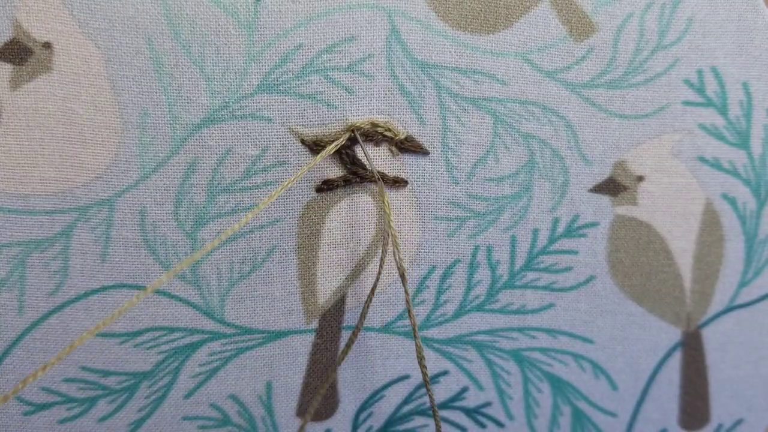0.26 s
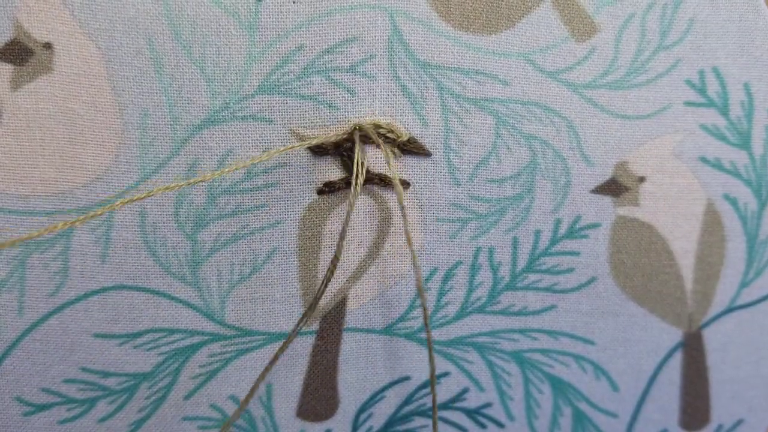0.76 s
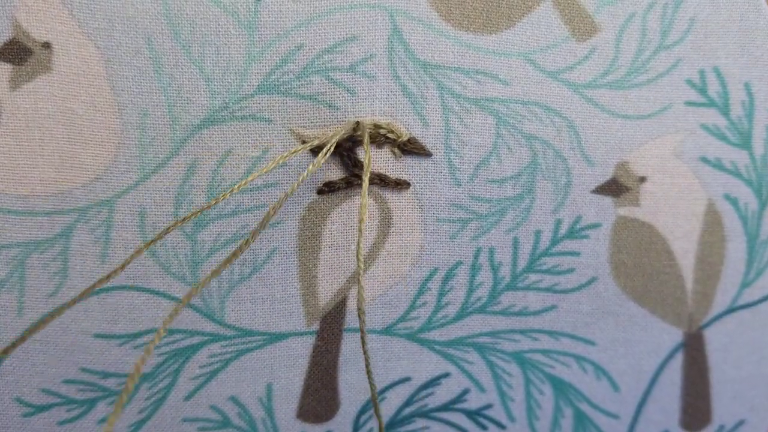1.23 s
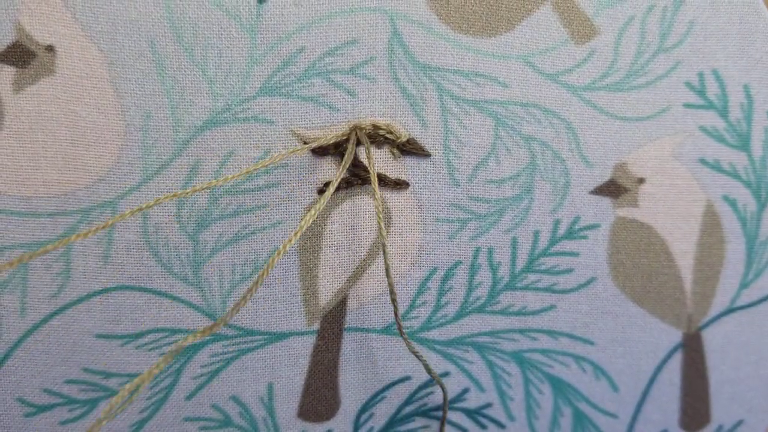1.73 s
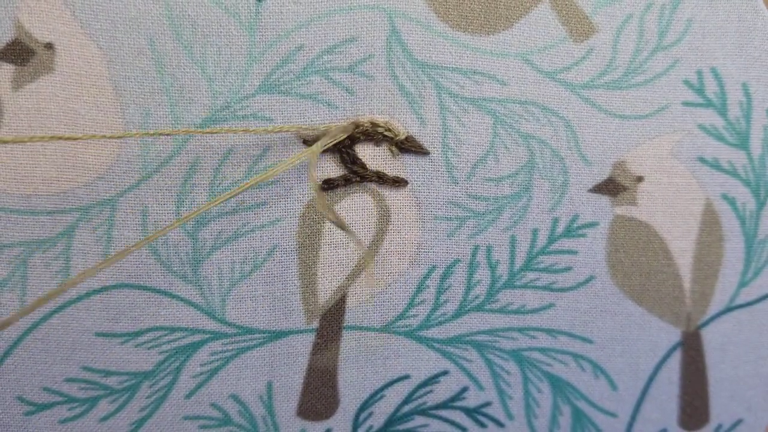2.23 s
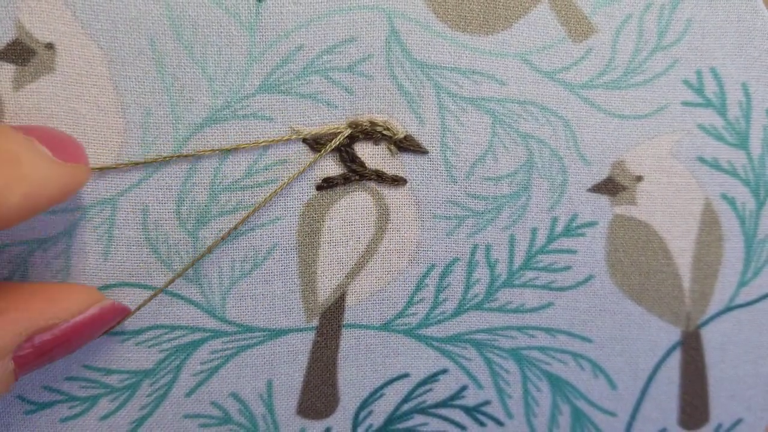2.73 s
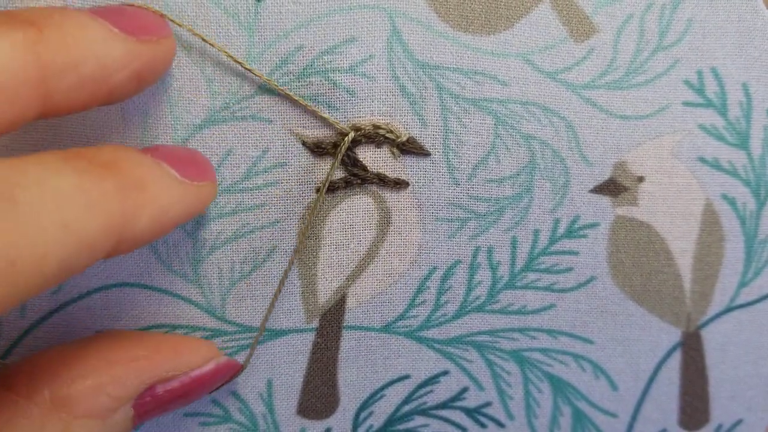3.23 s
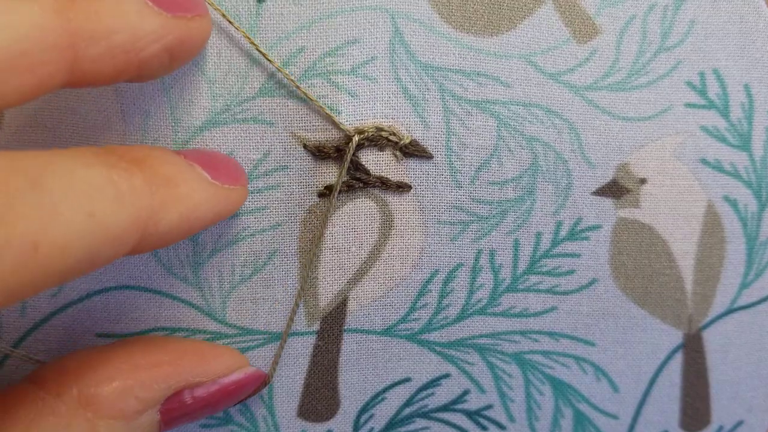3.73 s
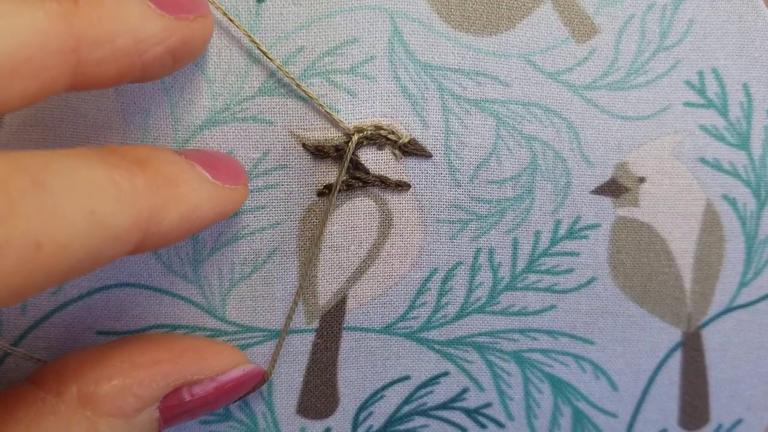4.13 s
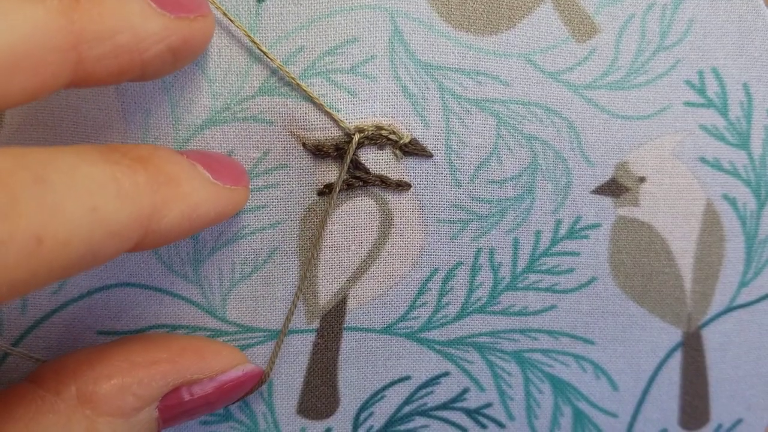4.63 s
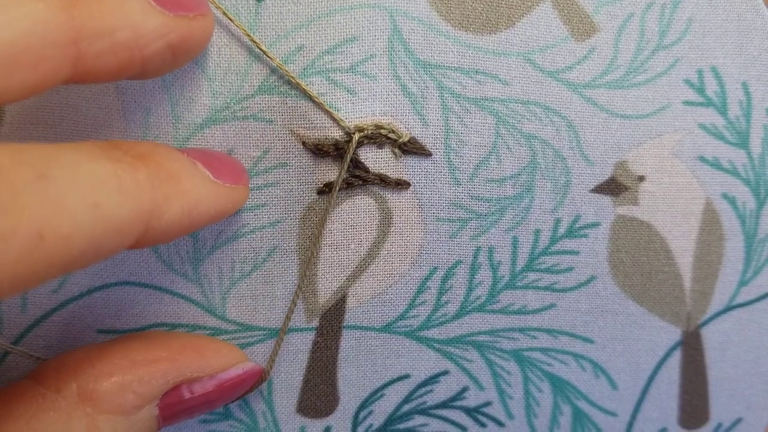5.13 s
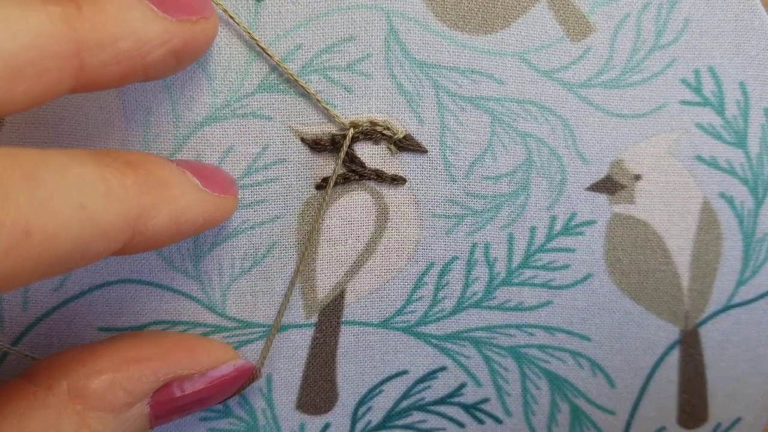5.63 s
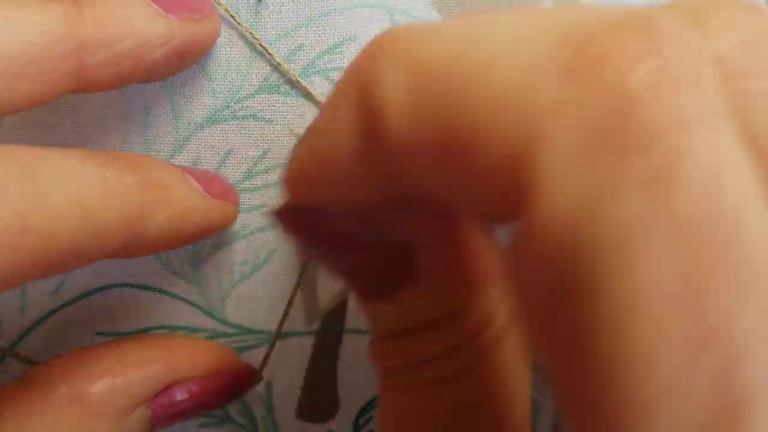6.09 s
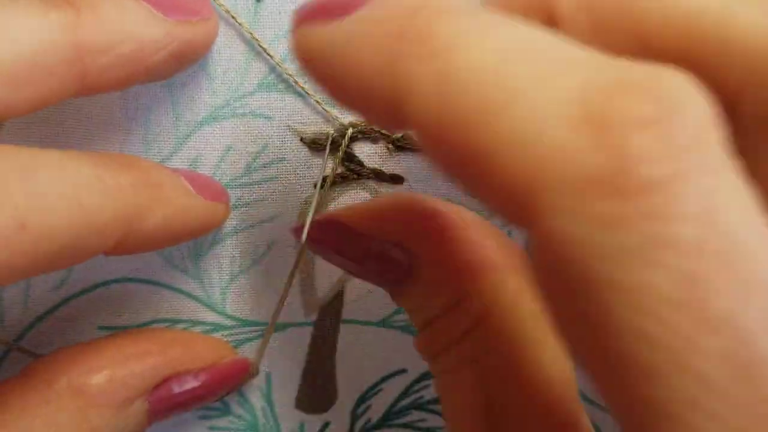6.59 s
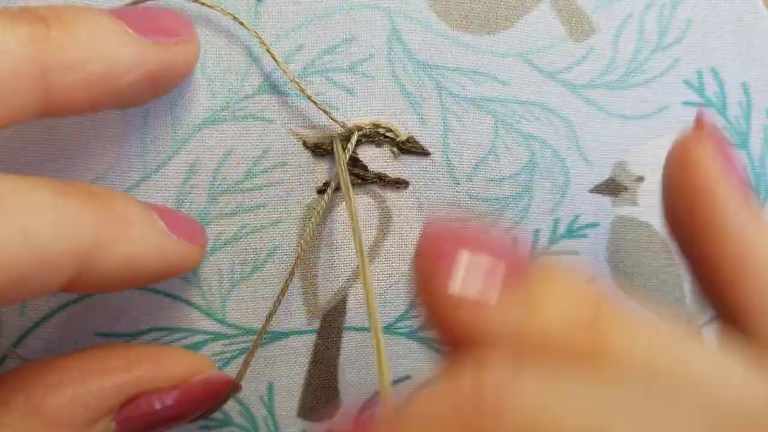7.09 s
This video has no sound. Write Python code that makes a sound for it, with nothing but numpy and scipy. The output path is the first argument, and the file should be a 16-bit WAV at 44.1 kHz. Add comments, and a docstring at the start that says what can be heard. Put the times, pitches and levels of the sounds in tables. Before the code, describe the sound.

Close stereo microphone in a quiet furnished room. Thread scuffs stretched cloth, a needle pops up with a drummy snap, and a long uneven thread pull rasps and rumbles through. Small dry ticks and light finger brushes follow, then near-silence, a few nudges and clicks, and a louder puncture with a quick, scratchy pull from below.

```python
"""Hand embroidery in a hoop

Close up in a quiet room, a needle pops up, and later down, through stretched cloth.
Damped modes make the cloth ring like a small slack drum at each pop and nudge.
Trains of random slips, filtered by resonances, make the thread rasp through the weave and shake the cloth.
Single impulses make the ticks of fibres as the stitch is laid and a few small clicks off to the right.
Thin steel pings, the whir of twisted thread and soft rubs join in over shaped noise for the room air."""
import sys
import numpy as np
from scipy import signal
from scipy.fft import rfft, irfft, next_fast_len
from scipy.io import wavfile
from scipy.ndimage import uniform_filter1d

SR = 44100
rng = np.random.default_rng(int(sys.argv[2]) if len(sys.argv) > 2 else 0)


def generate_wav(signal):
    """Clip the signal to [-1, 1] and save it as 16-bit WAV at the path in sys.argv[1]."""
    frames = np.transpose(np.atleast_2d(signal))
    scaled = np.clip(frames, -1, 1) * 32767
    pcm = np.round(scaled).astype(np.int16)
    wavfile.write(sys.argv[1], SR, pcm)


N = 324135  # samples, 7.35 s
BINS_HZ = np.fft.rfftfreq(4096, 1 / SR)
EDGE_HZ = 14620  # upper band limit

# All levels in the tables are relative; each layer is trimmed where it is mixed.
# room air: spectral density [f/Hz, level/dB per Hz]
AIR_SPECTRUM = [(15, -45), (25, -24), (50, -6), (81, -23), (95, -6), (120, -4.5), (157, -10), (210, -19.5),
                (267, -30), (313, -26.5), (442, -37), (2010, -41), (5100, -43), (6480, -45), (14400, -42.5)]
# room air: likeness of left and right [f/Hz, correlation/1]
AIR_LIKENESS = [(50, 0.99), (200, 0.86), (500, 0.25), (1200, 0), (3000, 0.025), (14000, 0)]
AIR_DB = -61.5  # rms
# reverberation of the room [f/Hz, t60/s]
ROOM_DECAY = [(100, 0.21), (500, 0.27), (2000, 0.25), (6000, 0.31), (14000, 0.16)]

# spectrum of the cloth jerked by the thread [f/Hz, level/dB]
TUG_SPECTRUM = [(25, -53.5), (45, -10.5), (65, -0.5), (120, 2), (175, 0), (240, -11), (330, -25.5),
                (600, -50), (1500, -73)]
# spectrum of strands rubbing the hole [f/Hz, level/dB]
SCRAPE_SPECTRUM = [(100, -19), (220, -3), (300, 5), (390, -2), (480, 0), (600, -4), (700, -14), (850, -14),
                   (1030, -20.5), (1650, -25), (2300, -32), (5000, -42)]
# spectrum of single fibres over the weave [f/Hz, level/dB]
HISS_SPECTRUM = [(300, -26), (1000, -8.5), (2000, 1.5), (3200, 1), (4500, -1), (5700, -2), (7800, -3),
                 (9500, 3), (11000, 8.5), (12800, 1), (14500, -3)]
# resonances of the rasp, one table for each way of sliding [f/Hz, width/Hz, level/dB]
LOOSE_RESONANCES = [(237, 120, 13), (720, 300, -3), (1230, 300, 11.5), (6660, 640, 11.5),
                    (10800, 2200, 0.5)]
NEEDLE_RESONANCES = [(1330, 160, 13.5), (2450, 450, 8), (3930, 1300, 6.5), (6700, 750, 5),
                     (10900, 1500, 1.5)]
UP_RESONANCES = [(677, 280, 5.5), (1362, 72, 10), (2375, 310, 10), (3420, 930, 0), (4150, 760, 4),
                 (6800, 400, 13)]
DOWN_RESONANCES = [(1250, 140, 11.7), (3000, 270, 3.3), (3960, 120, 14.4), (6780, 290, 7.4),
                   (8600, 310, 2.8), (11400, 350, 3.9), (12100, 420, 4.6)]
# balance of the fibre hiss [f/Hz, left minus right level/dB]
LOOSE_BALANCE = [(1000, 1), (3000, -0.5), (7000, -11), (10000, -7.5), (13000, -3.5)]
NEEDLE_BALANCE = [(1000, -12), (3000, -5.5), (7000, -7), (10000, -3), (13000, -7.5)]
UP_BALANCE = [(1000, 16.5), (3000, -9), (7000, -12), (10000, -13), (13000, -1.5)]
DOWN_BALANCE = [(1000, -4), (4000, -12), (7000, -9), (10000, -3), (13000, 3)]

# slack thread and fingers brush the cloth
# [start t/s, length/s, crest as share of length/1, tug level/dB, scrape level/dB, hiss level/dB]
BRUSH_STROKES = [(.13, 0.43, 0.48, -66.5, -81, -78), (.76, 0.23, 0.17, -56.5, -75.5, -78),
                 (.85, 0.66, 0.57, -61, -94, -86.5), (3.08, 0.13, 0.7, -67.5, -85, -75.5),
                 (3.45, 0.1, 0.82, -69, -74, -74), (3.62, 0.2, 0.095, -68, -71, -77.5),
                 (5.02, 0.13, 0.85, -72, -70.5, -73), (5.13, 0.24, 0.36, -62.5, -74.5, -73.5),
                 (5.32, 0.088, 0.73, -57, -85, -66), (5.68, .18, 0.65, -59, -78.5, -77.5),
                 (5.84, 0.23, 0.68, -70, -72.5, -81)]
BRUSH_SHAPE = 1.18  # exponent of the arch that a brush follows
# the thread grips and is dragged a short way
# [start t/s, hold/s, tug level/dB, scrape level/dB, hiss level/dB]
THREAD_DRAGS = [(.505, 0.082, -38.5, -53, -74), (2.213, 0.014, -63, -57.5, -59.5)]
# the needle shaft slides through after each pop
# [start t/s, hold/s, tug level/dB, scrape level/dB, hiss level/dB]
SHAFT_SLIDES = [(1.498, 0.096, -34, -47.5, -63), (6.753, 0.083, -35.5, -45.5, -59)]
GRIP_S, LET_GO_DB_PER_S = 0.011, 364  # a slide takes hold quickly and dies once it is through
# easing off throughout a slide [tug, scrape, hiss rate/(dB/s)]
EASE_RATES = (53.5, 89, 36)
# the long pull after the needle comes up [t/s, tug level/dB, scrape level/dB, hiss level/dB]
LONG_UP_PULL = [(1.68, -51, -83, -80), (1.714, -48, -70, -81.5), (1.77, -50, -72, -81.5),
                (1.84, -50, -70, -71.5), (1.98, -37, -58, -70), (2.07, -45, -61.5, -74.5),
                (2.2, -43.5, -61.5, -69), (2.28, -46.5, -66, -77.5), (2.36, -38.5, -56.5, -74),
                (2.42, -45.5, -62, -84), (2.5, -40.5, -53.5, -72), (2.63, -45.5, -59, -84.5),
                (2.74, -61, -76, -85)]
# the last of that thread drawn snug [t/s, tug level/dB, scrape level/dB, hiss level/dB]
SNUG_UP_PULL = [(2.82, -57, -78, -81.5), (2.87, -53.5, -64.5, -68.5), (2.93, -72, -67.5, -74.5),
                (2.975, -62, -77, -77), (3.01, -62, -86, -75.5), (3.1, -65, -91, -88)]
# the pull from below after the needle goes down [t/s, tug level/dB, scrape level/dB, hiss level/dB]
PULL_FROM_BELOW = [(6.98, -73, -103, -94), (7.016, -37, -52, -68.5), (7.06, -46, -48.5, -62.5),
                   (7.218, -39, -53, -64), (7.244, -45, -54, -68), (7.278, -45, -60.5, -69.5),
                   (7.35, -39, -47.5, -62)]
SURGE_DB, SURGE_S = 2.5, 0.025  # the thread sticks and gives: rms depth and smoothing length

# pops and nudges of the cloth, free and with two fingers pressing on it
# [t/s, level/dB, signed strength/1, contact standard deviation/ms, snap level re blow/dB]
FREE_CLOTH_BLOWS = [(0.7232, -26, 0.29, 1.2, -50), (1.4977, -17, 0.45, 0.13, 9),
                    (2.4557, -34.5, 0.54, 0.56, -50)]
HELD_CLOTH_BLOWS = [(5.271, -38.5, -1.13, 0.7, -54), (6.0068, -35, -1.43, 0.72, -53),
                    (6.0146, -25, 0.4, 0.91, -48), (6.156, -22.5, 0.47, 1.18, -50),
                    (6.1615, -31.5, -1.3, 0.79, -45), (6.749, -12, -0.82, 0.17, -1)]
# modes of the cloth, free and pressed tighter [f/Hz, level/dB, t60/s]
FREE_CLOTH_MODES = [(69.4, 1, 0.19), (89.6, 5, 0.059), (124.4, 2, 0.14), (166, -23.5, 0.106),
                    (278, -76, .1), (415, -41, .09), (453, -18.5, 0.19), (620, -19, .05), (780, -29, .05),
                    (1320, -13, .04), (1600, -37, 0.033), (2570, -18, .035)]
HELD_CLOTH_MODES = [(101.4, 1, 0.12), (144.6, -9.5, 0.11), (172, -14.5, 0.21), (261, -17.5, 0.12),
                    (356, -13, 0.025), (490, -9, 0.025), (600, -39, .04), (761, -20, 0.085),
                    (860, -38, 0.092), (1226, -21, .05), (1295, -29, 0.051), (1860, -47, .05)]
# spectrum of the needle breaking through [f/Hz, level/dB]
SNAP_SPECTRUM = [(100, -17.5), (400, 4), (800, -7.5), (1400, 3), (2000, -15), (3000, -19.5), (4000, -14),
                 (5500, -56), (14500, -60)]
# spectrum of fibres parting round the needle [f/Hz, level/dB]
CRACK_SPECTRUM = [(400, -14), (1400, 15), (2400, -0.5), (3900, -1.5), (4800, -10.5), (5800, -26.5),
                  (6800, -7), (8000, -28), (11000, -13), (14500, -32)]
RIGHT_LAG_MS = 0.085  # sounds of the cloth reach the right ear this much later

# small clicks off to the right [t/s, peak level/dB, room level re click/dB]
CLICK_EVENTS = [(0.821, -60.5, 2), (0.8712, -58, -9), (1.4256, -64, -1), (1.453, -65, 7), (5.6257, -42, 3),
                (5.914, -54, 2), (5.9725, -55, 0), (6.09, -59, 2), (6.123, -60, -1), (6.1614, -54, 3.5),
                (6.3606, -71, -11.5), (6.6977, -68.5, -11), (6.9574, -63.5, -15.5)]
# spectrum of the clicks [f/Hz, level/dB]
CLICK_SPECTRUM = [(250, 2), (900, 2.5), (1300, -2.5), (2400, -4), (3500, -3), (5400, -10.5), (6700, -7.5),
                  (7800, -29), (9500, -15), (14000, -29.5)]
# resonances of the clicks [f/Hz, width/Hz, level/dB]
CLICK_RESONANCES = [(895, 63, 5), (1712, 310, 8.5), (3280, 520, 10.5), (4480, 850, 7)]

# the needle tip pings faintly as it feels for its place [t/s, f/Hz, level/dB, t60/s]
NEEDLE_PINGS = [(1.423, 2920, -71, 0.11), (1.451, 1760, -64.5, 0.095), (1.453, 2900, -74.5, .1),
                (6.362, 1900, -67, 0.013), (6.3613, 2900, -77, 0.021), (6.698, 2310, -70, .025)]

# the whir of the twist during the long pull: one arch rising in pitch and loudness and falling back
WHIR_START_S, WHIR_LENGTH_S, WHIR_CREST = 1.9, 0.65, 0.47  # crest as share of length
WHIR_LOW_HZ, WHIR_HIGH_HZ, WHIR_DB = 3100, 4370, -74.5

# fibres catching and letting go [t/s, treble snap level/dB, midrange knock level/dB]
TICK_EVENTS = [(2.2167, -67, -42.5), (2.2335, -64, -44), (3.1758, -59, -75), (3.2696, -58.5, -61),
               (3.5235, -53, -51), (3.6056, -52.5, -65), (3.646, -43, -47), (3.68, -57, -56),
               (3.7456, -58.5, -54.5), (3.7802, -62, -58), (4.4195, -51.5, -48), (4.4223, -72, -45.5)]
# resonances of the ticks [f/Hz, width/Hz, level/dB]
TICK_RESONANCES = [(450, 300, 4), (1300, 260, 10), (2200, 700, 7), (3500, 600, 4), (6700, 500, 3),
                   (10500, 1300, 9)]
# spectrum of a fibre plucking the cloth [f/Hz, level/dB]
KNOCK_SPECTRUM = [(100, -22), (300, 3), (520, 3), (900, 5), (1300, -1), (1700, -2), (2200, 0), (3200, -7),
                  (6000, -30), (14000, -45)]


def amp(db):
    """Decibel law: turns a level into an amplitude gain."""
    return 10 ** (np.asarray(db) / 20)


def unit(x):
    """Root-mean-square normalisation: scales x to rms 1."""
    return x / np.sqrt(np.mean(x ** 2) + 1e-20)


def read(points, hz=BINS_HZ):
    """Linear interpolation on a logarithmic frequency axis, for a curve given by points."""
    f, value = np.transpose(points)
    return np.interp(np.log(hz + 1), np.log(f + 1), value)


def bumps(resonances):
    """Resonance peaks: the sum in dB of bell-shaped Lorentzian curves."""
    return sum(db / (1 + (2 * (BINS_HZ - hz) / width) ** 2) for hz, width, db in resonances)


def add(mix, s, sound):
    """Superposition: lays a sound into the mix at time s."""
    part = mix[..., round(s * SR):][..., :sound.shape[-1]]
    part += sound[..., :part.shape[-1]]


def through(x, response):
    """Convolution: passes x through one impulse response, or one for each ear."""
    x, response = np.atleast_2d(x), np.atleast_2d(response)
    size = next_fast_len(x.shape[1] + response.shape[1], True)
    return irfft(rfft(x, size) * rfft(response, size), size)[:, :N]


def ring_of(db):
    """Minimum phase: a dB spectrum fixes a causal impulse response, here with energy 1."""
    log_gain = np.log(amp(np.concatenate([db, db[-2:0:-1]])))
    response = np.fft.ifft(np.exp(signal.hilbert(log_gain).conj())).real
    return response / np.linalg.norm(response)


def panned(left_db):
    """Interaural level difference: gains of two channels that differ by left_db."""
    return amp(np.array([[left_db], [-left_db]]) / 2)


def placed(x, left_db):
    """Interaural level and time differences: left_db sets the balance, and the left is a little earlier."""
    late = np.interp(np.arange(N) - RIGHT_LAG_MS * SR / 1000, np.arange(N), x[0])
    return panned(left_db) * np.array([x[0], late])


def scatter(fade_s):
    """Diffuse scattering: dense reflections, different in each ear, energy 1, nearly even spectrum."""
    t = np.arange(len(BINS_HZ)) / SR
    fade = amp(-60 * t / fade_s)
    z = rfft(rng.standard_normal((2, len(t))) * fade)
    # flatten the spectrum, then fade again by half as many decibels
    burst = irfft(z / abs(z), len(t)) * np.sqrt(fade)
    return burst / np.linalg.norm(burst, axis=1, keepdims=True)


def room(x):
    """Reverberation of a small furnished room: each band of a noise tail decays at its own rate."""
    hz, t, z = signal.stft(rng.standard_normal((2, SR // 2)), SR, nperseg=256)
    decay = amp(-60 * t / read(ROOM_DECAY, hz)[:, None])
    tail = signal.istft(z * decay, SR, nperseg=256)[1]
    # silent for 3 ms, then rising over 3.7 ms
    tail *= np.clip((np.arange(tail.shape[1]) / SR - 0.003) / 0.0037, 0, 1)
    return through(x, tail / np.linalg.norm(tail[0]))


def slips(per_s, spread_db):
    """Stick-slip friction as a random impulse train of uneven size and sign, rms 1."""
    at = np.flatnonzero(rng.random(N) < per_s / SR)
    size = rng.exponential(1, N)[at]
    sign = np.sign(rng.random(N)[at] - 0.5)
    train = np.zeros(N)
    train[at] = sign * amp(spread_db * np.minimum(size, 4))
    return unit(train)


def arch(start, length, crest):
    """Sinusoidal easing: a curve from 0 up to 1 at its crest and back to 0."""
    turning_s = start + length * np.array([0, crest, 1])
    return np.sin(np.pi / 2 * np.interp(np.arange(N) / SR, turning_s, [0, 1, 0]))


def air():
    """Ambient noise: low rumble, alike in both ears, under a thin even hiss."""
    hz = np.fft.rfftfreq(N, 1 / SR)
    left, other = rfft(rng.standard_normal((2, N)))
    same = np.clip(read(AIR_LIKENESS, hz), -1, 1)
    right = same * left + np.sqrt(1 - same ** 2) * other
    z = np.array([left, right])
    return amp(AIR_DB) * unit(irfft(z * amp(read(AIR_SPECTRUM, hz)), N))


def brushed(rows):
    """Speed-governed friction: tug, scrape and hiss gains swell and fade with the hand's speed, an arch."""
    return sum(np.outer(amp(levels_db), arch(start, length, crest) ** BRUSH_SHAPE)
               for start, length, crest, *levels_db in rows)


def slid(rows):
    """Friction of firm slides: gains of tug, scrape and hiss that grip, ease off and let go."""
    t, gains = np.arange(SR // 2) / SR, np.zeros((3, N))
    for start, hold, *levels_db in rows:
        fall_db = np.outer(EASE_RATES, t) + LET_GO_DB_PER_S * np.maximum(t - hold, 0)
        grip = np.minimum(t / GRIP_S, 1)
        add(gains, start, grip * amp(np.array(levels_db)[:, None] - fall_db))
    return gains


def pulled(rows):
    """Friction along one pull: gains of tug, scrape and hiss joined in dB, silent outside it."""
    s, *levels_db = np.transpose(rows)
    t = np.arange(N) / SR
    during = (t >= s[0]) & (t <= s[-1])
    gains = np.array([amp(np.interp(t, s, db)) for db in levels_db]) * during
    return uniform_filter1d(gains, size=300, axis=1)


def surges():
    """Slow stick-slip: a gain of rms 1 that wanders as the thread sticks and gives."""
    wander = uniform_filter1d(rng.standard_normal(N), size=round(SURGE_S * SR))
    return unit(amp(SURGE_DB * unit(wander)))


def weave(resonances, balance):
    """Resonant filtering by the weave: what one slipping fibre sounds like in each ear."""
    db = read(HISS_SPECTRUM) + bumps(resonances)
    lean_db = read(balance) / 2
    ears_db = np.array([db + lean_db, db - lean_db])
    # ring_of gives each ear energy 1, so their relative strength is restored
    strength = unit(np.linalg.norm(amp(ears_db), axis=1))
    return np.array([g * ring_of(ear) for g, ear in zip(strength, ears_db)])


def thread(gains, resonances, balance, tug_db, scrape_db, hiss_db, fibres_per_s, spread_db, room_db,
           body_share=0.33, spots=3):
    """Frictional excitation: twists jerk the cloth, strands scrape the hole, fibres hiss over the weave."""
    tugging, scraping = gains[:2] * surges()
    hissing = gains[2]
    peaks_db = bumps(resonances)
    tug_slips = slips(per_s=370, spread_db=2.5) * tugging
    tug = through(tug_slips, ring_of(read(TUG_SPECTRUM) + body_share * peaks_db))
    scrape_slips = slips(per_s=1800, spread_db=1.5) * scraping
    scrape = through(scrape_slips, ring_of(read(SCRAPE_SPECTRUM) + peaks_db))
    scrape = placed(scrape, left_db=4.5) + amp(-8.0) * through(scrape, scatter(fade_s=0.031))
    # fibres slip at several spots, each with its own paths to the ears
    spot_gain = hissing / np.sqrt(spots)
    fibres = sum(through(slips(fibres_per_s / spots, spread_db) * spot_gain, scatter(fade_s=0.025))
                 for spot in range(spots))
    hiss = through(fibres, weave(resonances, balance))
    direct = amp(tug_db) * placed(tug, left_db=6.5) + amp(scrape_db) * scrape + amp(hiss_db) * hiss
    return direct + amp(room_db) * room(direct)


def scuffs(scuff_db=-29, ms_per_contact_ms=11, muffle_hz=520):
    """Contact friction: each blow also rubs the weave for a moment; the softer the contact, the longer."""
    t, pressure = np.arange(SR // 5) / SR - 0.1, np.zeros(N)
    for s, db, _, contact_ms, _ in FREE_CLOTH_BLOWS + HELD_CLOTH_BLOWS:
        width = contact_ms * ms_per_contact_ms / 1000
        add(pressure, s + t[0] + width / 2, amp(db + scuff_db) * np.exp(-abs(t) / width))
    rubbing = slips(per_s=3600, spread_db=8) * pressure
    rub = placed(through(rubbing, ring_of(read(SCRAPE_SPECTRUM))), left_db=2)
    rub = signal.sosfilt(signal.butter(2, muffle_hz, fs=SR, output="sos"), rub)
    return rub + amp(-4.5) * room(rub)


def cloth(blows, modes, snap_db, crack_db, left_db, snap_left_db, room_db):
    """Modal vibration: the dented cloth rings; long contact leaves only low modes, a needle adds a snap."""
    t = np.arange(SR // 3) / SR
    ring = sum(amp(db - 60 * t / t60) * np.cos(2 * np.pi * hz * t) for hz, db, t60 in modes)
    lead_s = 1 / 50  # the push starts this long before its peak
    pushes, snaps = np.zeros((2, N))
    for s, db, strength, contact_ms, sharp_db in blows:
        push = np.exp(-((t - lead_s) * 1000 / contact_ms) ** 2 / 2)
        add(pushes, s - lead_s, strength * amp(db) * push / push.sum())
        snaps[round(s * SR)] = strength * amp(db + sharp_db)
    snap = through(snaps, ring_of(read(SNAP_SPECTRUM)))
    body = placed(through(pushes, ring), left_db) + amp(snap_db) * placed(snap, snap_left_db)
    # a small hoop radiates no deep bass
    body = signal.sosfilt(signal.butter(2, 50, "high", fs=SR, output="sos"), body)
    crack = through(through(snaps, ring_of(read(CRACK_SPECTRUM))), scatter(fade_s=0.027))
    direct = body + amp(crack_db) * crack
    return direct + amp(room_db) * room(direct)


def clicks(click_db=12, left_db=-5):
    """Direct-to-reverberant ratio: small hard contacts farther off, some heard mostly through the room."""
    near, far = np.zeros((2, N))
    for s, db, room_db in CLICK_EVENTS:
        near[round(s * SR)] = amp(db + click_db)
        far[round(s * SR)] = amp(db + click_db + room_db)
    arriving = through(near, scatter(fade_s=0.037)) + room(far)
    return panned(left_db) * through(arriving, ring_of(read(CLICK_SPECTRUM) + bumps(CLICK_RESONANCES)))


def pings(left_db=-3, rough=0.91):
    """Damped free vibration: thin rings of the steel needle, roughened as it drags on the weave."""
    t, out = np.arange(SR // 4) / SR, np.zeros(N)
    for s, hz, db, t60 in NEEDLE_PINGS:
        drag = 1 + rough * unit(uniform_filter1d(rng.standard_normal(len(t)), size=70))
        add(out, s, amp(db - 60 * t / t60) * drag * np.sin(2 * np.pi * hz * t))
    return panned(left_db) * out


def whir(width_hz=800, left_db=-7):
    """Narrow-band noise on a gliding carrier: the twist whirs, rising in pitch and loudness and falling back."""
    swell = arch(WHIR_START_S, WHIR_LENGTH_S, WHIR_CREST)
    centre_hz = WHIR_LOW_HZ + (WHIR_HIGH_HZ - WHIR_LOW_HZ) * swell
    carrier = np.exp(2j * np.pi * np.cumsum(centre_hz) / SR)
    smooth = signal.butter(2, width_hz / 2, fs=SR, output="sos")
    low_band = signal.sosfilt(smooth, slips(per_s=5000, spread_db=8))
    band = unit((carrier * low_band).real)
    return panned(left_db) * through(amp(WHIR_DB) * band * swell, scatter(fade_s=0.017))


def ticks(tick_db=15, knock_db=9, room_db=-9):
    """Impulsive release: a caught fibre lets go with one large slip and a small knock of the cloth."""
    snaps, knocks = np.zeros((2, N))
    for s, treble_db, mid_db in TICK_EVENTS:
        snaps[round(s * SR)] = amp(treble_db + tick_db)
        knocks[round(s * SR)] = amp(mid_db + knock_db)
    direct = through(through(snaps, weave(TICK_RESONANCES, UP_BALANCE)), scatter(fade_s=0.012))
    knock = through(through(knocks, ring_of(read(KNOCK_SPECTRUM))), scatter(fade_s=0.045))
    direct += panned(left_db=-1.5) * knock
    return direct + amp(room_db) * room(direct)


def scene():
    """Superposition of one stitch up through free cloth and one down beside the pressing fingers."""
    loose = thread(slid(THREAD_DRAGS) + brushed(BRUSH_STROKES), LOOSE_RESONANCES, LOOSE_BALANCE,
                   tug_db=-2, scrape_db=3.0, hiss_db=2.5, fibres_per_s=4900, spread_db=4.0, room_db=-12.5)
    free = cloth(FREE_CLOTH_BLOWS, FREE_CLOTH_MODES,
                 snap_db=-30, crack_db=3.5, left_db=5.5, snap_left_db=-5, room_db=-10.0)
    needle = thread(slid(SHAFT_SLIDES), NEEDLE_RESONANCES, NEEDLE_BALANCE,
                    tug_db=-3.5, scrape_db=-1.0, hiss_db=6, fibres_per_s=6100, spread_db=0.5, room_db=-18.0)
    up = thread(pulled(LONG_UP_PULL) + pulled(SNUG_UP_PULL), UP_RESONANCES, UP_BALANCE,
                tug_db=-2, scrape_db=0, hiss_db=6.5, fibres_per_s=4200, spread_db=1.5, room_db=-6.5)
    held = cloth(HELD_CLOTH_BLOWS, HELD_CLOTH_MODES,
                 snap_db=-0.5, crack_db=3.0, left_db=6.0, snap_left_db=0.0, room_db=-12.0)
    down = thread(pulled(PULL_FROM_BELOW), DOWN_RESONANCES, DOWN_BALANCE,
                  tug_db=0.5, scrape_db=1, hiss_db=6.5, fibres_per_s=7800, spread_db=3.5, room_db=-10.0)
    stitches = loose + free + needle + up + held + down
    return air() + stitches + scuffs() + clicks() + pings() + whir() + ticks()


def record(dry):
    """Band limitation: a linear-phase low-pass filter removes the highest treble."""
    low_pass = signal.firwin(511, EDGE_HZ, window=("kaiser", 9), fs=SR)
    return signal.oaconvolve(dry, low_pass[None], "same")


dry = scene()
out = record(dry)
generate_wav(out)
```